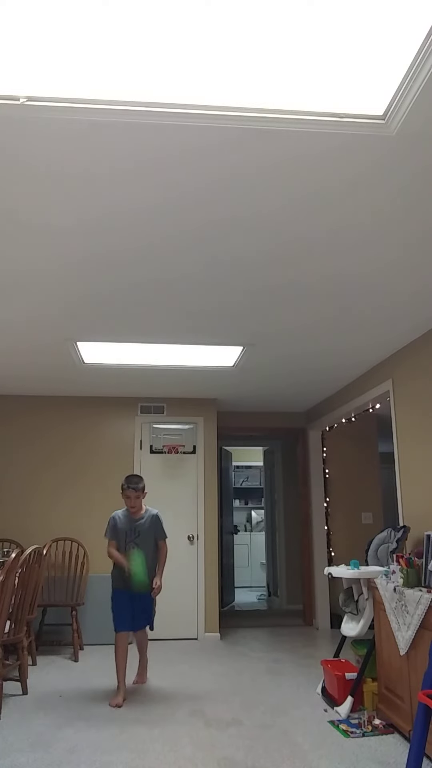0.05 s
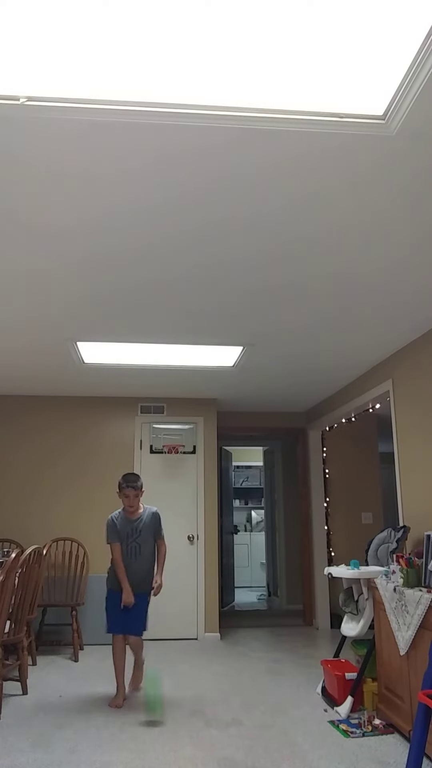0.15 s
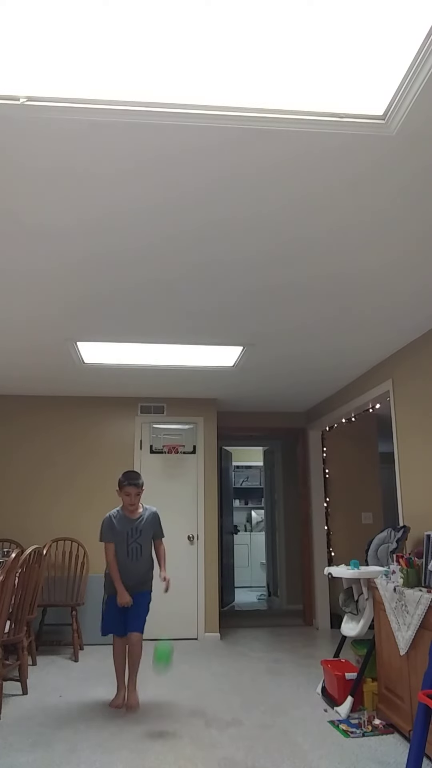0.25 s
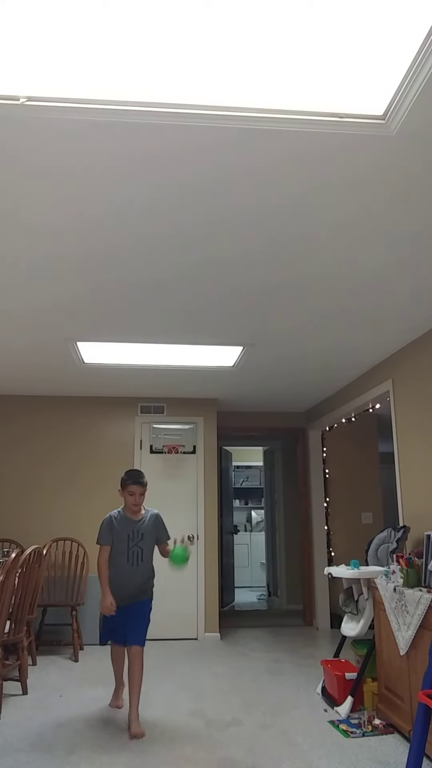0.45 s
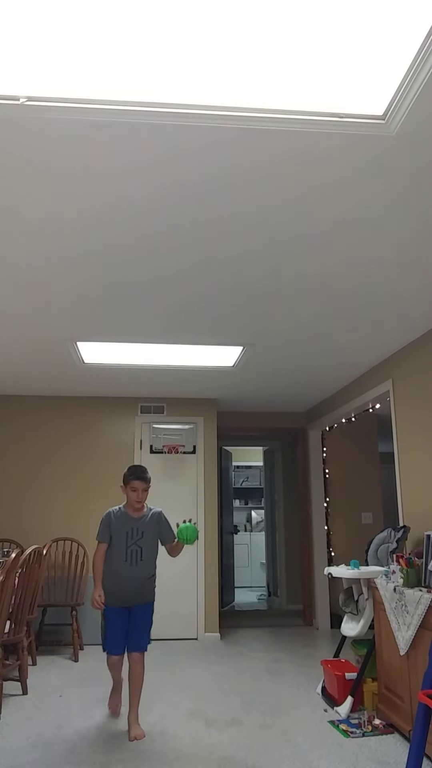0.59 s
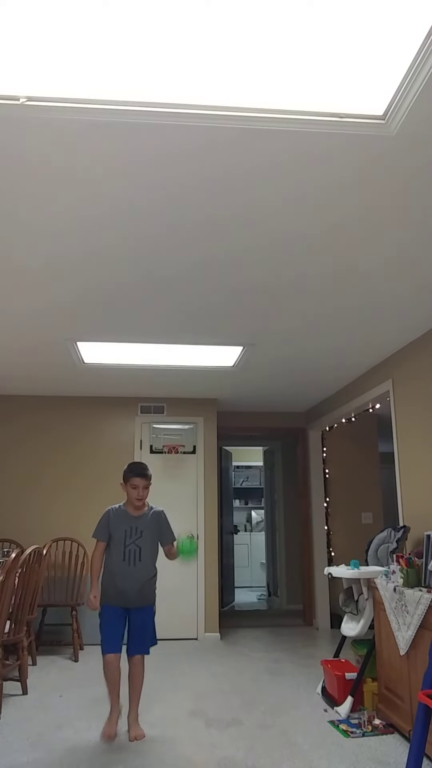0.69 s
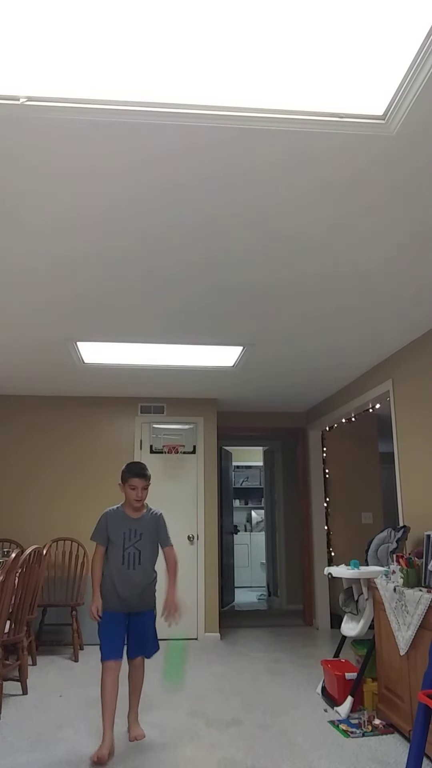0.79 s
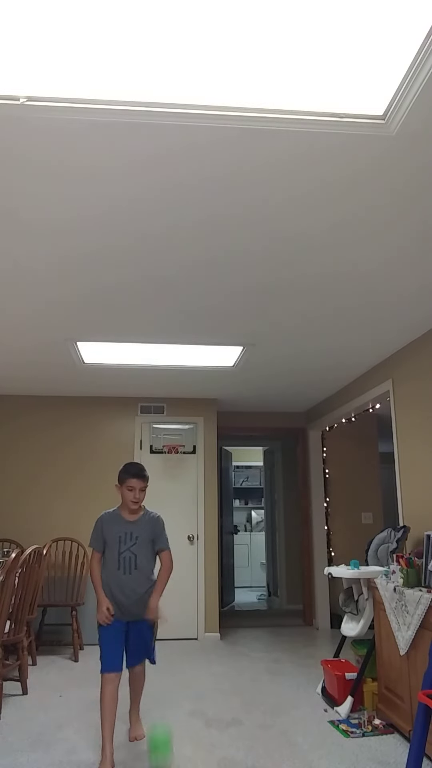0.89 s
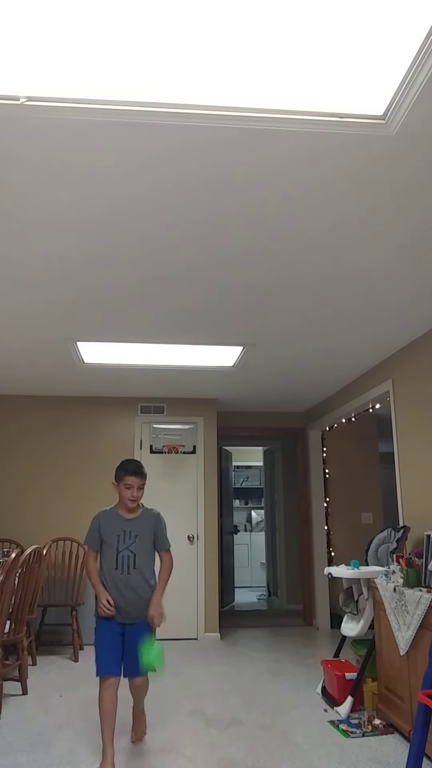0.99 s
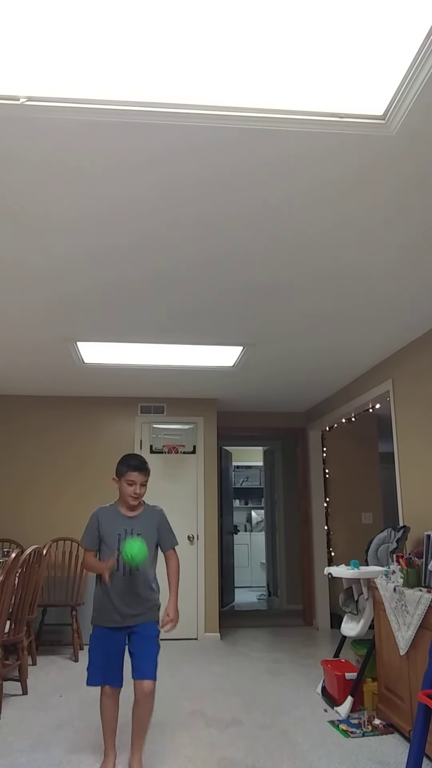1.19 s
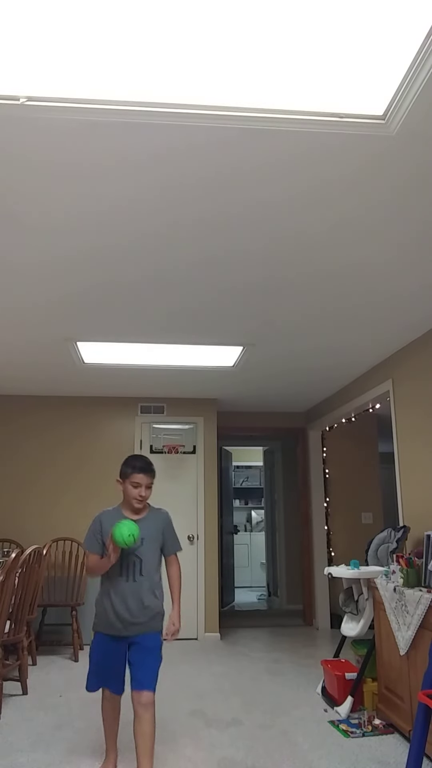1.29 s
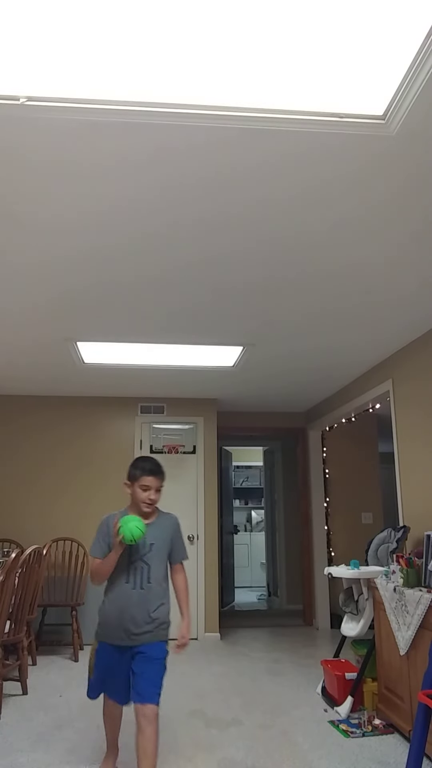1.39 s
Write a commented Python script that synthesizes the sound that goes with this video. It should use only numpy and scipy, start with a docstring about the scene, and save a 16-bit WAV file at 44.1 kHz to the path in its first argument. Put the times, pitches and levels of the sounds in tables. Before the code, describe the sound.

A small hollow ball bounces twice on a hard floor in a large living room.

```python
"""A small hollow ball, bounced twice on the hard floor of a large living room, heard on one microphone.
Each bounce is a short pock, thrown back by ceiling and walls and left ringing in the room.
The second sounds closer, with more direct sound, as the barefoot walker comes toward the microphone.
Around the bounces, over quiet room tone, lie soft rustles, faint thin tones and one dull footfall."""
import sys
import numpy as np
from scipy import signal
from scipy.fft import rfft, irfft, next_fast_len
from scipy.io import wavfile
from scipy.ndimage import map_coordinates

SR = 44100
rng = np.random.default_rng(int(sys.argv[2]) if len(sys.argv) > 2 else 0)


def store_wav(level_fs):
    """Save 16-bit WAV to argv[1]."""
    pcm = np.round(np.clip(np.atleast_2d(level_fs), -1, 1) * 32767)
    wavfile.write(sys.argv[1], SR, pcm.T.astype(np.int16))


N = 63945

# colour of the room tone (frequency [Hz], relative level [dB])
ROOM_TONE_COLOUR = [(25, -33.5), (110, -32), (185, -24.5), (240, -10), (350, -19.5), (520, -6.5),
                    (750, -9.5), (1100, -13), (2000, -10.5), (3000, -20), (4500, -23.5), (8000, -27),
                    (15500, -30)]
# reverberation of the living room (frequency [Hz], t60 [s])
ROOM_DECAY = [(60, 0.07), (160, 0.4), (350, 0.32), (600, 0.37), (1000, 0.4), (2000, 0.51), (4000, 0.43),
              (12000, .6)]
# echoes off ceiling, walls and furniture, a list per landing spot (delay [s], level before scatter [dB])
REFLECTIONS = [
    [(.0037, 0), (.0068, 0), (.0087, -1), (.0098, -3), (.0119, 0), (.0149, -1), (.0169, -3), (.0245, -5),
     (.0274, -5), (.0284, -6), (.0350, -7), (.0370, -4), (.0379, -7), (.0428, -7), (.0525, -7)],
    [(.0043, -1), (.0053, -1), (.0078, -5), (.0092, -3), (.0107, -6), (.0160, -4), (.0191, -4), (.0245, -7),
     (.0260, -6), (.0328, -7), (.0343, -5), (.0380, -8), (.0447, -9), (.0482, -5)],
]
# faint thin tones (peak time [s], half length [s], frequency [Hz], relative level [dB])
THIN_TONES = [(.56, .035, 1530, -62), (.555, .03, 2310, -69), (.625, .035, 508, -62),
              (.635, .03, 1505, -66), (.62, .025, 1880, -66), (.79, .03, 1885, -68), (.80, .03, 1968, -66),
              (.81, .04, 2094, -64.5), (.89, .015, 2700, -66), (1.28, .025, 732, -64),
              (1.322, .015, 780, -64)]
# rustles of hands, clothes and soles (peak time [s], rise [s], fall [s], level [dB], tilt [dB/octave])
RUSTLE_SWELLS = [(0.014, 0.025, 0.031, -57.5, 0.5), (0.191, 0.042, 0.067, -65, 0.5),
                 (0.417, 0.026, 0.031, -57.5, 5), (0.623, 0.03, 0.042, -63.5, -6.5),
                 (.79, 0.017, 0.029, -68.5, -3), (.90, 0.011, 0.074, -61, 2.5),
                 (1.08, 0.13, 0.052, -61.5, 3), (1.28, 0.029, 0.14, -65.5, -8),
                 (1.359, 0.03, 0.054, -60, 3)]
# colour of a rustle before its tilt (frequency [Hz], relative level [dB])
RUSTLE_COLOUR = [(130, -71), (230, -17), (450, -15.5), (1000, 3), (1700, 1.5), (3000, -7), (5000, -14),
                 (8000, -29), (15000, -35.5)]
# colour of a bare heel on the floor (frequency [Hz], relative level [dB])
HEEL_COLOUR = [(40, -25), (100, -22), (180, -17), (270, -0.5), (600, 5.5), (1000, -4.5), (2000, -9),
               (4000, -44), (12000, -43)]
# resonances left ringing (frequency [Hz], weight in bounce one [dB], in bounce two [dB], t60 [s])
RING_MODES = [(159.7, -11, -13.5, .28), (283.2, -6.5, -3.5, 0.29), (309.7, -3.5, -6.5, 0.31),
              (434.7, 0.5, -0.5, .36), (520, -3, -6.5, 0.48), (585.7, -1, 5, 0.37), (627, -4, -9, 0.44),
              (734, -25, 1.5, 0.35), (829, -2.5, -2, 0.43), (928, -1, -9, 0.42), (1007, 0.5, -24, 0.44),
              (1038, 2.5, -9, 0.35), (1108, -7.5, -10.5, 0.41), (1371, -15, -4, .32),
              (1775, -20, -22, 0.67), (2100, -35.5, -17.5, 0.41), (3016, -33, -30.5, 0.78),
              (3950, -38, -32, 0.56)]
# colour of the smack of the ball's skin (frequency [Hz], relative level [dB])
SMACK_COLOUR = [(500, -34.5), (1500, -32), (2800, 4.5), (4100, 1.5), (5200, -19), (8000, -25), (15000, -29)]
# colour of the pock before its low cut (frequency [Hz], gain in bounce one [dB], in bounce two [dB])
POCK_COLOUR = [(30, -7, -14), (91, 4.5, 6), (260, -2, -3.5), (590, 0.5, 2.5), (964, 3.5, 2), (1484, -5, -9),
               (1670, -22, -11), (2380, -19, -19), (3100, -24.5, -24.5), (4010, -30.5, -35.5),
               (4860, -39.5, -38), (8000, -48.5, -45.5), (15000, -56.5, -55)]
# the bounces, one per landing spot
# (time [s], pock gain [dB], direct path gain [dB], ring gain [dB], smack gain [dB], far wall delay [s])
BALL_BOUNCES = [(0.2326, 11.5, 1.5, -31, -33, 0.082), (.9180, 11.5, 6, -31, -43, .0947)]


def amp(db):
    """Decibels to gain."""
    return 10 ** (np.asarray(db) / 20)


def along(points, hz):
    """(Hz, value) points read on a log axis."""
    freqs, values = np.transpose(points)
    return np.interp(np.log(hz + 1), np.log(freqs + 1), values)


def clock():
    """Time of each sample in seconds."""
    return np.arange(N) / SR


def swell(peak_s, half_s):
    """A bell-shaped envelope."""
    return np.exp(-((clock() - peak_s) / half_s) ** 2 / 2)


def wobble(rate):
    """A smooth random curve, rate knots a second."""
    return map_coordinates(rng.standard_normal(256), [clock() * rate + 2], mode="wrap")


def filtered(x, response):
    """x through a complex response of frequency."""
    size = 2 * next_fast_len(N)
    return irfft(rfft(x, size) * response(np.fft.rfftfreq(size, 1 / SR)), size)[:N]


def minimum_phase(db):
    """Causal response with these levels."""
    cepstrum = irfft(np.log(amp(db)))
    half = len(cepstrum) // 2
    return np.exp(rfft(np.r_[cepstrum[0], 2 * cepstrum[1:half], np.zeros(half)]))


def delay(hz, s):
    """Response of a delay."""
    return np.exp(-2j * np.pi * hz * s)


def high_pass(hz, corner_hz, q=1):
    """Response of a second-order high-pass."""
    s = 1j * hz / corner_hz
    return s * s / (s * s + s / q + 1)


def noise(colour, tilt_db=0):
    """Coloured noise of rms 1, tilted per octave."""
    x = filtered(rng.standard_normal(N), lambda hz: amp(along(colour, hz) + tilt_db * np.log2(hz + 1)))
    return x / np.sqrt(np.mean(x ** 2) + 1e-20)


def room_tone(level_db=-64.5, drift_db=0.6):
    """The quiet noise of the living room, drifting slightly in level."""
    return amp(level_db + drift_db * wobble(6.4)) * noise(ROOM_TONE_COLOUR)


def diffuse_tail(gain_db=8.5, rise_s=0.0046, gap_s=0.001993):
    """Sound scattered around the room builds quickly, then each band dies at its own rate."""
    freqs, t, bands = signal.stft(rng.standard_normal(N), SR, nperseg=256)
    decay = amp(-60 * t / along(ROOM_DECAY, freqs)[:, None])
    tail = signal.istft(bands * decay, SR, nperseg=256)[1][:N]
    tail *= (1 - np.exp(-clock() / rise_s)) * amp(gain_db) / np.linalg.norm(tail)
    return filtered(tail, lambda hz: delay(hz, gap_s) * high_pass(hz, corner_hz=96) ** 2)


def room_response(spot, direct_db, far_wall_s, direct_top_hz=3300, early_top_hz=4770, scatter_db_per_s=54):
    """Floor to microphone: dull direct sound, early reflections, their far wall return and the tail."""
    def paths(hz):
        direct = amp(direct_db) / (1 + (hz / direct_top_hz) ** 6)
        early = sum(amp(db - scatter_db_per_s * s) * delay(hz, s) for s, db in REFLECTIONS[spot])
        early /= np.hypot(1, (hz / early_top_hz) ** 2)
        far_wall = amp(-20.5) * high_pass(hz, corner_hz=160) * delay(hz, far_wall_s)
        return (direct + early) * (1 + far_wall)
    return diffuse_tail() + filtered(signal.unit_impulse(N), paths)


def thin_tones(gain_db=1, wander_hz=7):
    """Faint, slightly unsteady tones that swell and fade."""
    out = np.zeros(N)
    for peak_s, half_s, hz, db in THIN_TONES:
        phase = 2 * np.pi * np.cumsum(hz + wander_hz * wobble(58.7)) / SR
        out += amp(db + gain_db) * swell(peak_s, half_s) * np.sin(phase)
    return out


def rustles():
    """Soft swells of friction noise as the walker moves and catches the ball."""
    out = np.zeros(N)
    for peak_s, rise_s, fall_s, db, tilt_db in RUSTLE_SWELLS:
        envelope = swell(peak_s, np.where(clock() < peak_s, rise_s, fall_s))
        out += amp(db) * envelope * noise(RUSTLE_COLOUR, tilt_db)
    return out


def footfall(start=1.422, gain_db=-16.5):
    """A bare heel pats the floor, heard through the same reflections as the second bounce."""
    room = room_response(spot=1, direct_db=-3, far_wall_s=BALL_BOUNCES[-1][-1])
    heel = lambda hz: minimum_phase(along(HEEL_COLOUR, hz)) * delay(hz, start)
    return amp(gain_db) * filtered(room, heel)


def air_push(start, lag_s=0.0059):
    """One soft, low pulse of air as the ball flattens."""
    return amp(-61.5) * swell(start + lag_s, half_s=0.0049)


def ring(start, spot, rise_s=0.0056, waver_db=2.5):
    """Resonances that swell after a bounce and waver as they die away."""
    t = np.maximum(clock() - start, 0)
    modes = np.zeros(N)
    for hz, *weights_db, t60 in RING_MODES:
        envelope = amp(weights_db[spot] - 60 * t / t60 + waver_db * wobble(34))
        modes += envelope * np.sin(2 * np.pi * (hz * t + rng.random()))
    return modes * (1 - np.exp(-t / rise_s))


def smack(start, spot, rise_s=0.0006, snap_t60=0.011, after_ring_t60=0.23):
    """A bright snap of the ball's skin, reaching the microphone by the two shortest reflections."""
    out = np.zeros(N)
    for lag_s, _ in REFLECTIONS[spot][:2]:
        t = np.maximum(clock() - start - lag_s, 0)
        decay = amp(-60 * t / snap_t60) + amp(-22 - 60 * t / after_ring_t60)
        out += noise(SMACK_COLOUR) * (1 - np.exp(-t / rise_s)) * decay
    return out


def pock(start, spot, room, low_cut_hz=539):
    """The hollow knock, heard through the room; so small a ball radiates little bass."""
    colour = [(hz, gains_db[spot]) for hz, *gains_db in POCK_COLOUR]
    radiated = lambda hz: -amp(along(colour, hz)) * high_pass(hz, low_cut_hz, q=1.96)
    return filtered(room, lambda hz: radiated(hz) * delay(hz, start))


def ball():
    """Each bounce sends a pock, a smack and a push of air into the room and sets it ringing."""
    out = np.zeros(N)
    for spot, (start, pock_db, direct_db, ring_db, smack_db, far_wall_s) in enumerate(BALL_BOUNCES):
        room = room_response(spot, direct_db, far_wall_s)
        out += amp(pock_db) * pock(start, spot, room)
        out += amp(ring_db) * ring(start, spot)
        out += amp(smack_db) * smack(start, spot)
        out += air_push(start)
    return out


def scene():
    """Room tone, ball and walker as they meet at the microphone, in mono."""
    return (room_tone() + ball() + rustles() + thin_tones() + footfall())[None]


def record(dry, top_hz=15750):
    """The recorder keeps nothing above its band limit."""
    return filtered(dry[0], lambda hz: hz < top_hz)[None]


dry = scene()
out = record(dry)
store_wav(out)
```